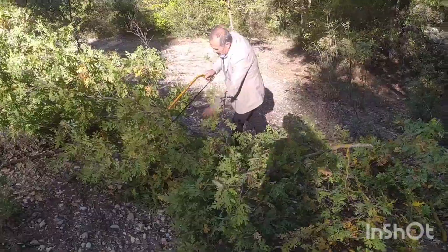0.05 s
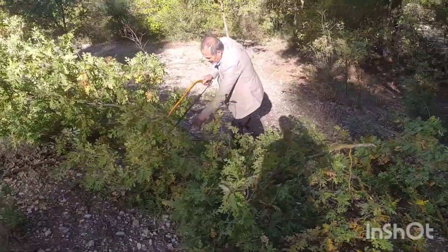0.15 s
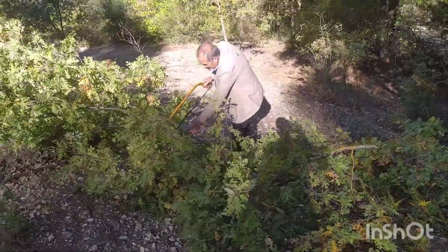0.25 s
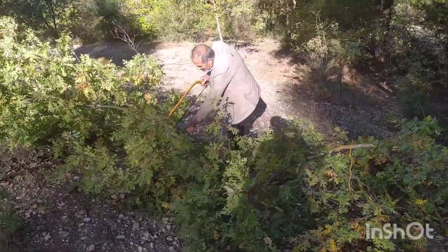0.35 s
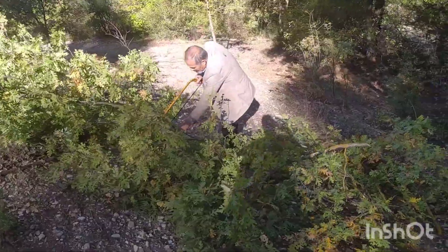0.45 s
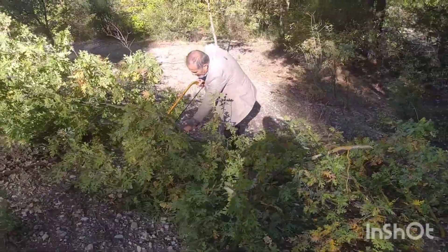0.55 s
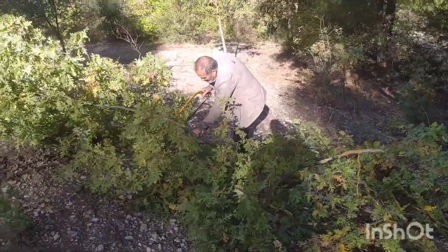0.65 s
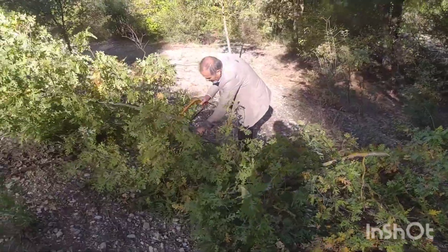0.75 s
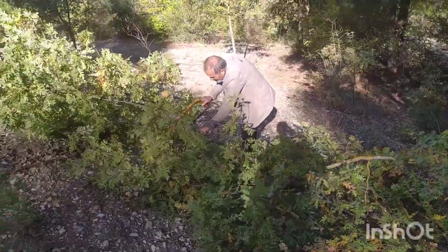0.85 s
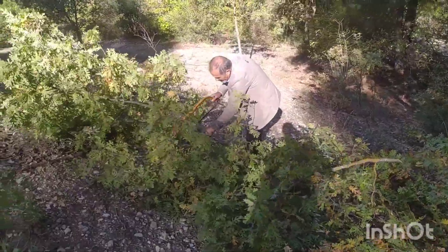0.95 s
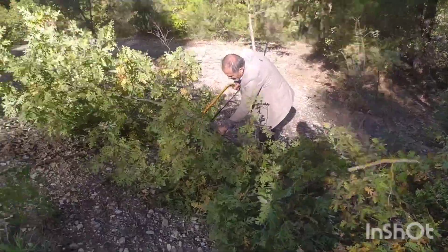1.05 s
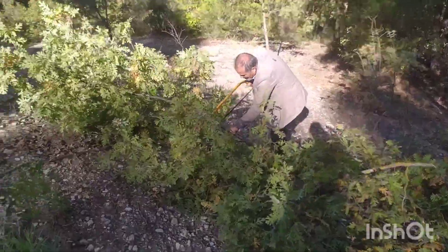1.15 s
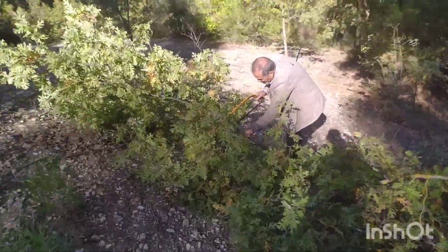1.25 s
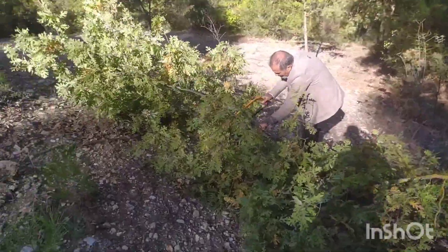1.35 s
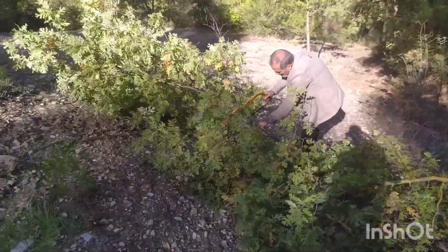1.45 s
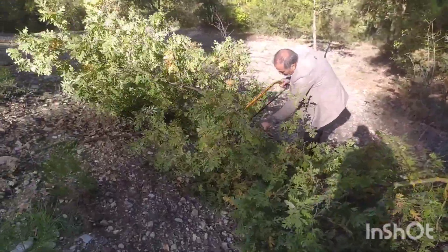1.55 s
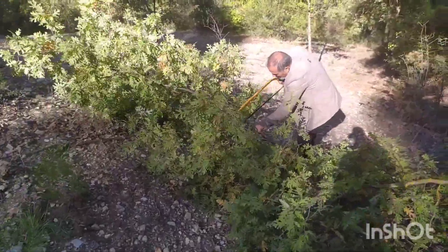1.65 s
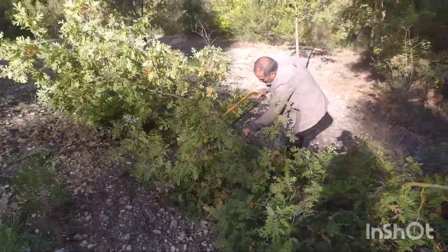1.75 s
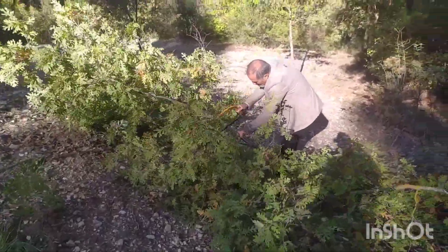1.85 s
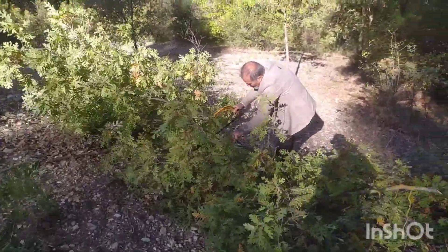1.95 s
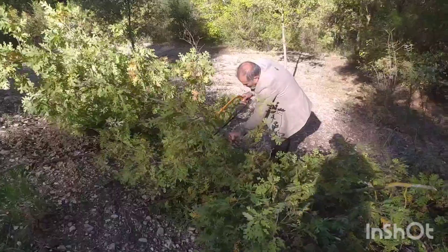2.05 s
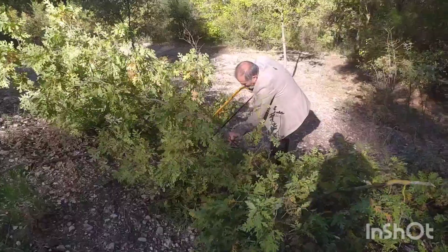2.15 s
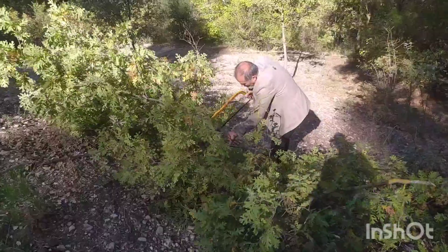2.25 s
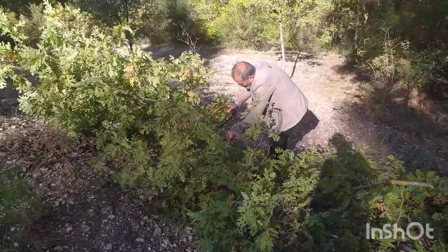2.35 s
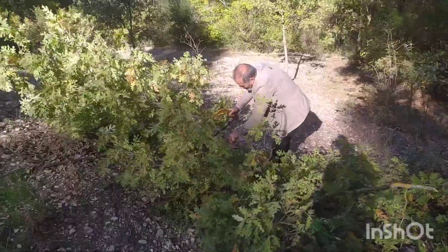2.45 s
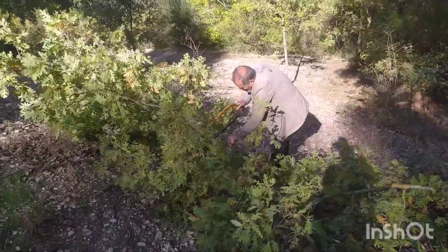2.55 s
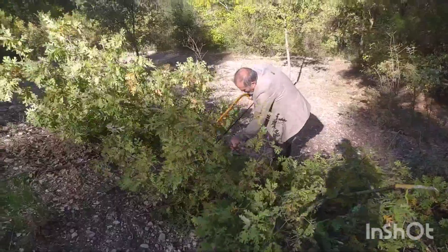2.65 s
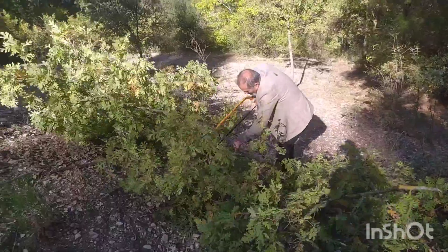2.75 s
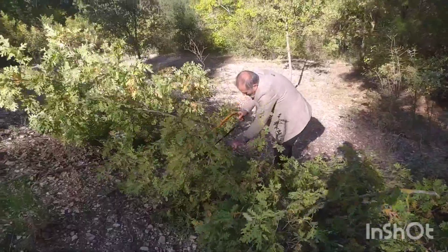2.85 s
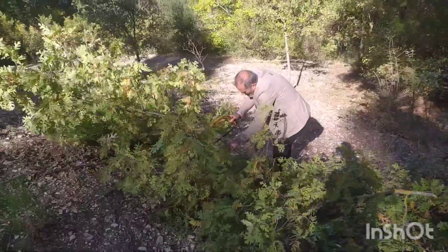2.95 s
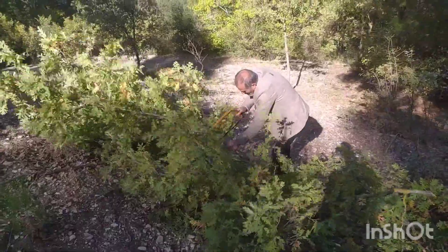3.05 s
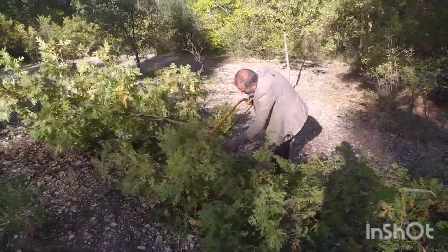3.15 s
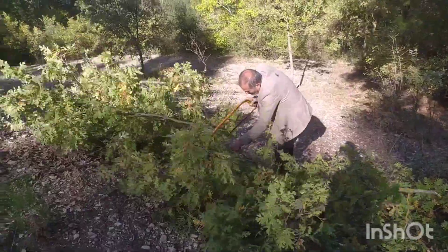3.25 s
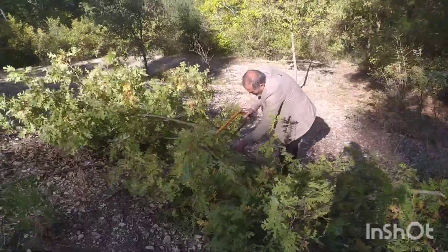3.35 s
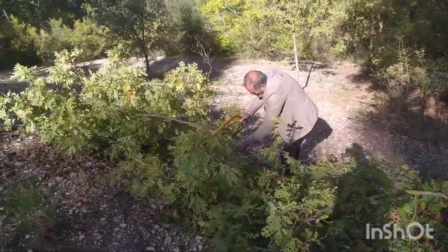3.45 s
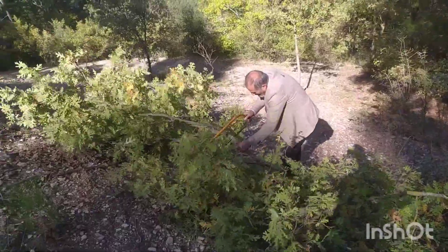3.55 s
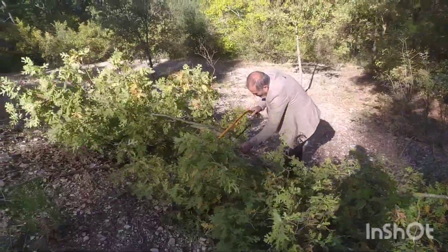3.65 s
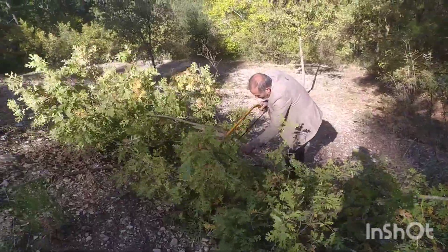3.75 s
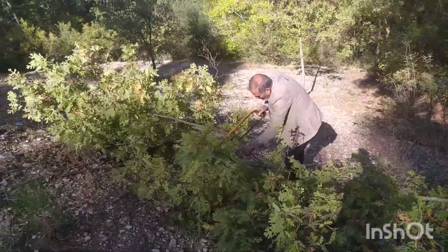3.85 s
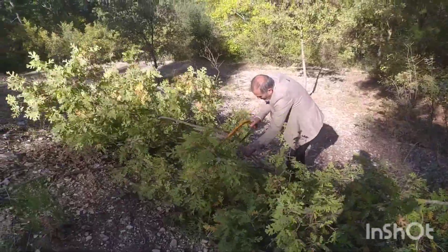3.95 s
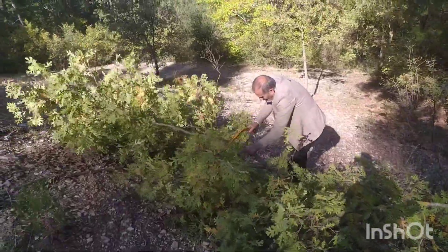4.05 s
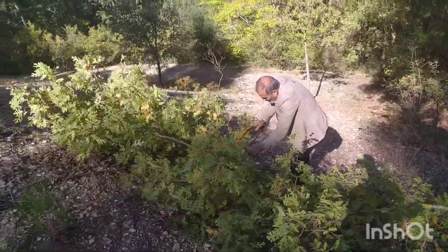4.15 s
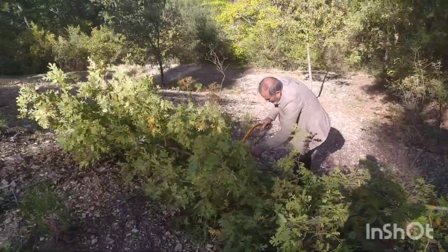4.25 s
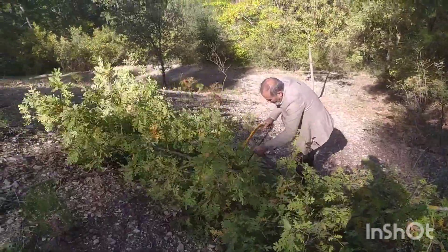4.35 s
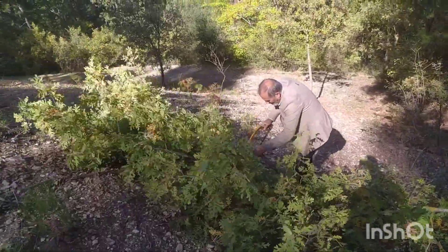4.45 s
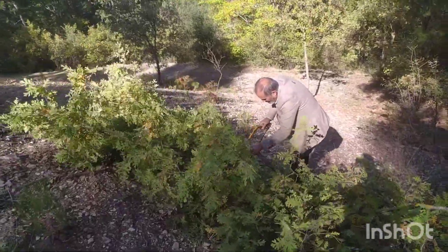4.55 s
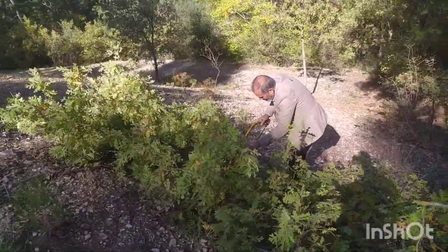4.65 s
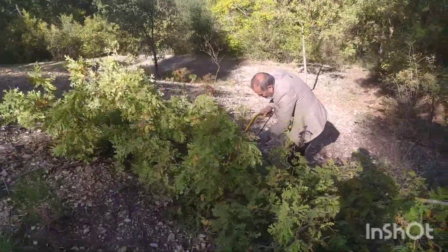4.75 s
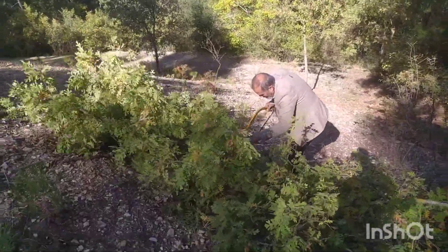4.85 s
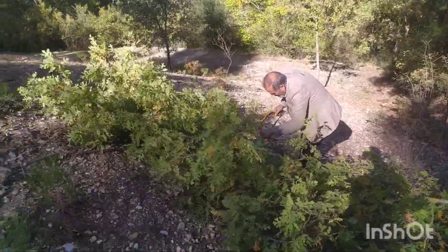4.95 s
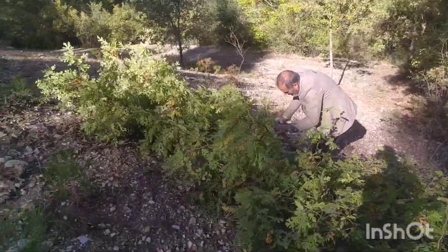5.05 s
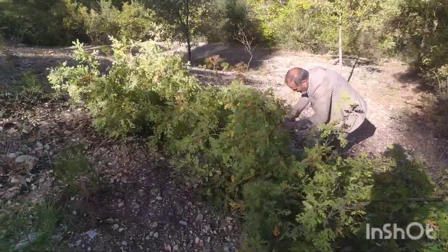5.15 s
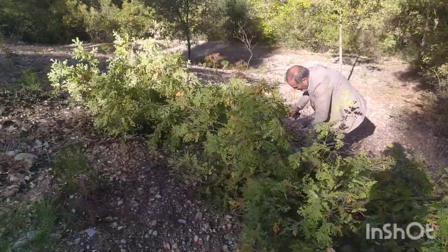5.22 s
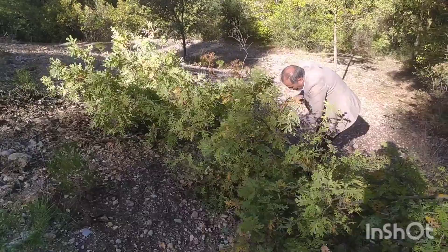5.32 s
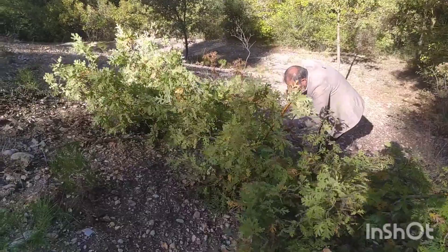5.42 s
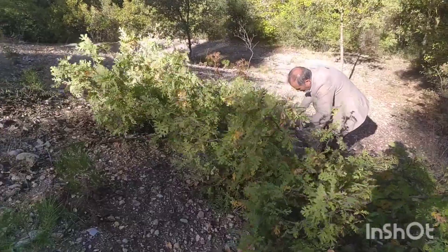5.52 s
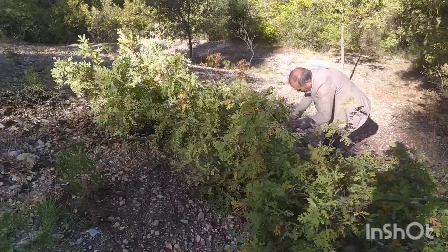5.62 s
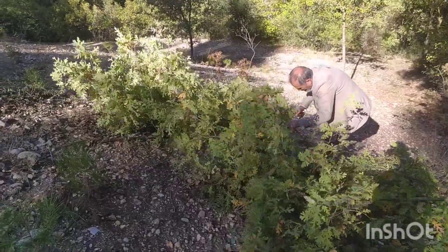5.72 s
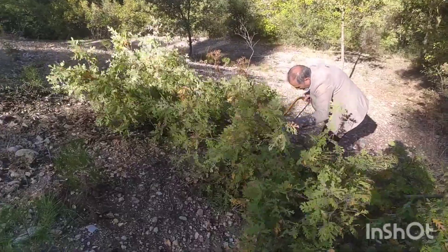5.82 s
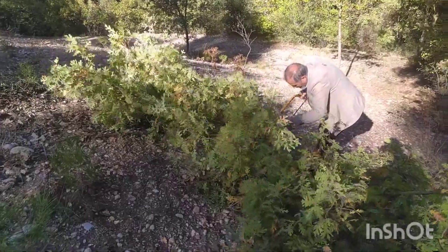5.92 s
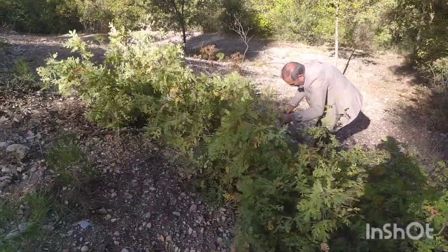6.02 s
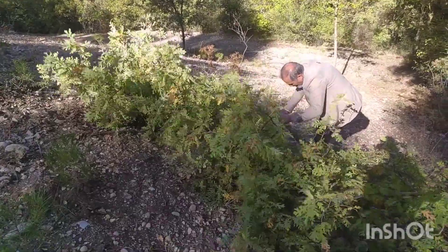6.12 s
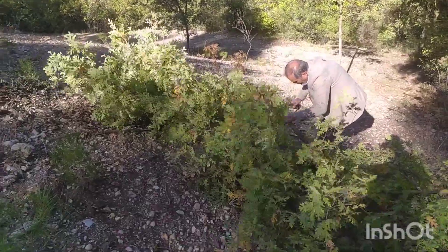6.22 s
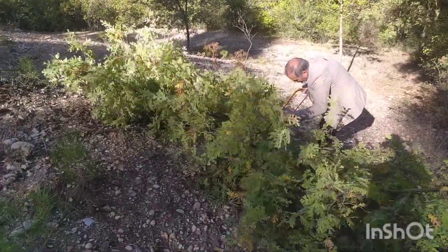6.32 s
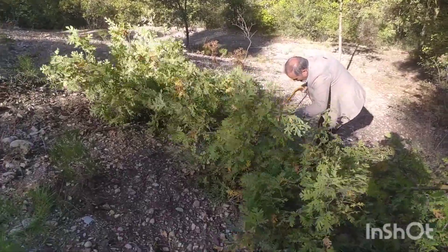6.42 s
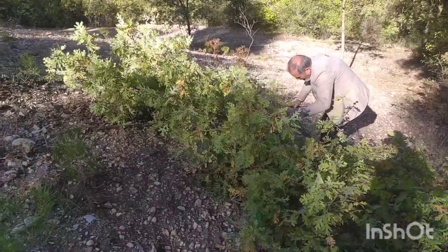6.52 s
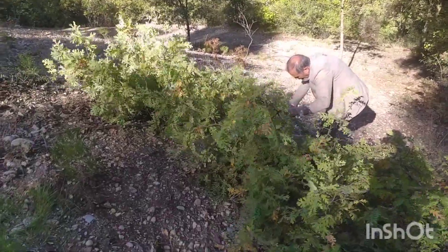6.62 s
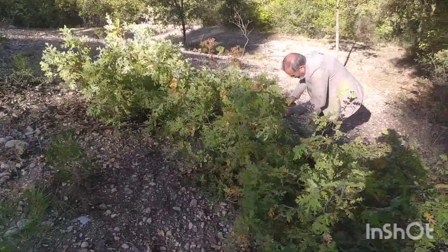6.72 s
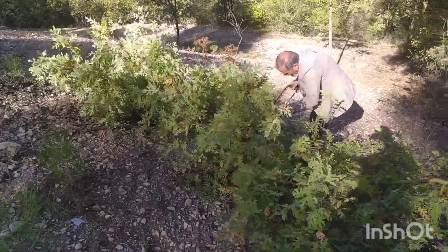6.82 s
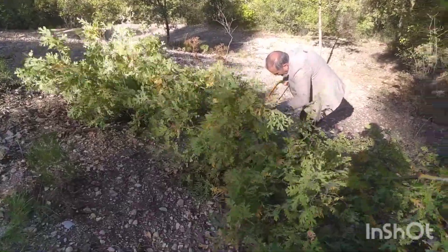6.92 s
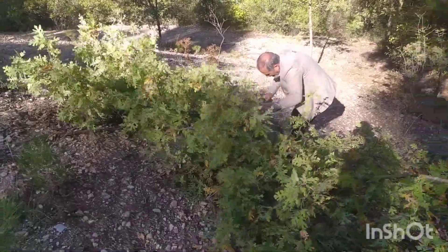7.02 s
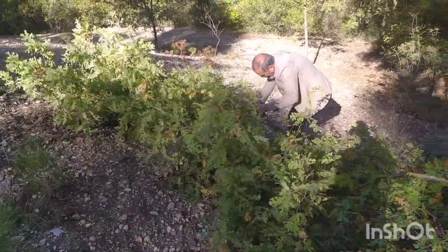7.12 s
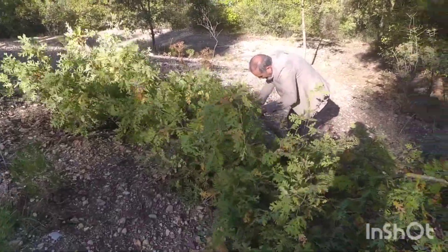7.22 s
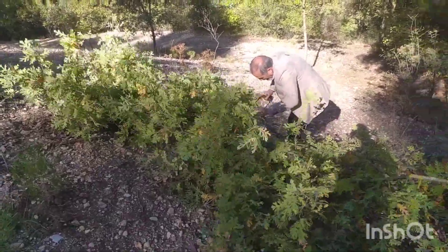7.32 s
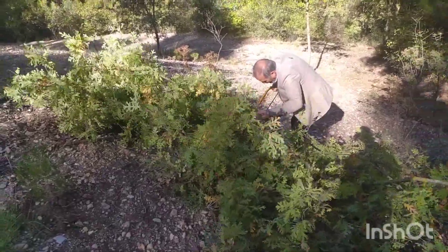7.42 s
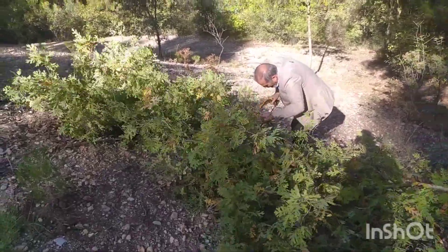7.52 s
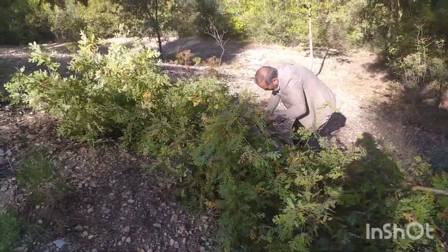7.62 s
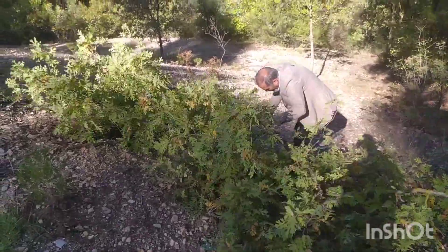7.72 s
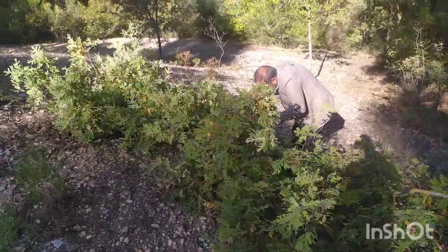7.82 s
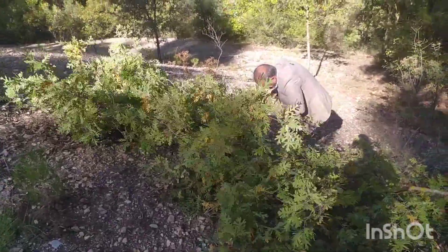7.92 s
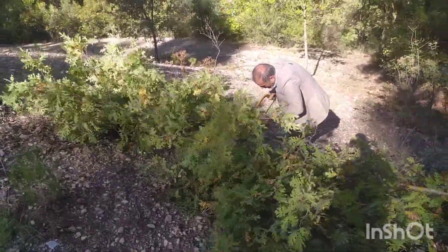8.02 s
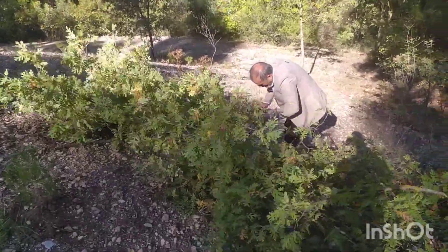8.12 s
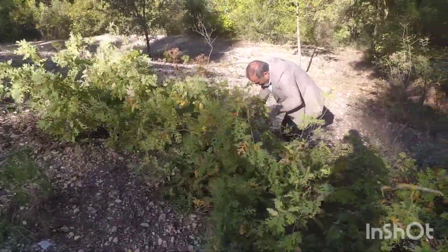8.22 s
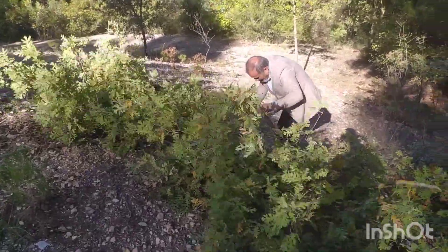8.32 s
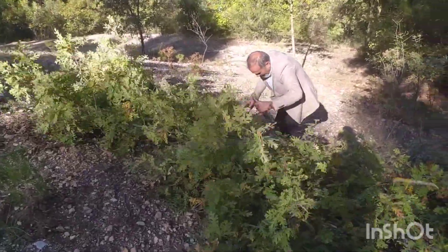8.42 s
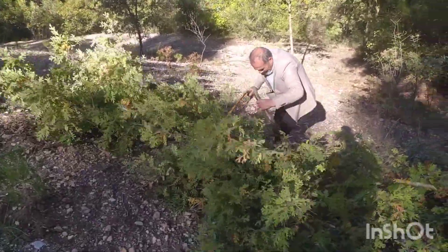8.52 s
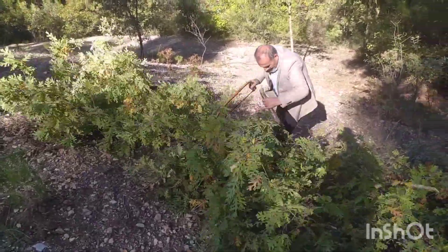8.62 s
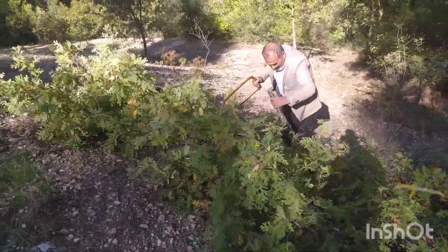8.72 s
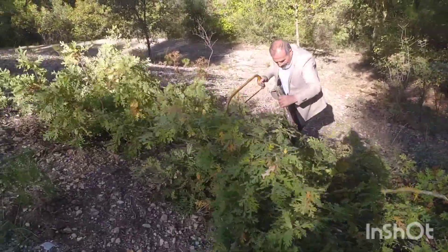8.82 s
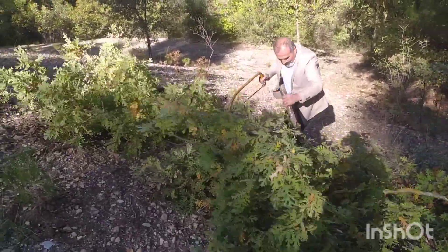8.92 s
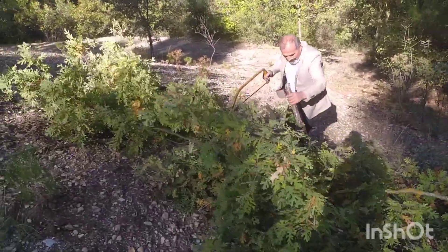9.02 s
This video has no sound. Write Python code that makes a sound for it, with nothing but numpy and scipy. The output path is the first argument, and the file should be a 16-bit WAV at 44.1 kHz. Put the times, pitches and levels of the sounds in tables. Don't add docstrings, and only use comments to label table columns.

```python
import sys
import numpy as np
from scipy import signal
from scipy.fft import rfft, irfft, next_fast_len
from scipy.io import wavfile
from scipy.ndimage import uniform_filter1d, map_coordinates

SR = 44100
rng = np.random.default_rng(int(sys.argv[2]) if len(sys.argv) > 2 else 0)


def pcm_store(signal):
    levels = np.round(np.clip(np.atleast_2d(signal), -1, 1) * 32767)
    wavfile.write(sys.argv[1], SR, levels.astype(np.int16).T)


def amplitude_ratio(level_db):
    exponent = np.asarray(level_db, float) / 20
    return 10 ** exponent


N = 400365

# start in seconds, length in seconds, bite in dB,
# pressure gained over the stroke in dB, steel hiss over the bite in dB.
PUSHES = [(1.17, 0.275, -35, 6.5, 6.5), (1.713, 0.2685, -32, 3.5, 7.5), (2.223, 0.2576, -32, 11.5, 6),
          (2.754, 0.2717, -33, -1, 6.5), (3.282, 0.2783, -37, -16.5, 7.5),
          (3.838, 0.304, -40.5, -29.5, 7.5), (4.905, 0.3103, -40, 11.5, 5), (5.46, 0.2624, -34.5, -3.5, 5),
          (5.954, 0.2612, -32, -4, 3), (6.417, 0.2832, -35, 34, 4.5), (6.941, 0.288, -31.5, 22.5, 3),
          (7.453, 0.2835, -37.5, 24.5, 6), (8.084, 0.192, -31.5, -13.5, 8.5)]
PULLS = [(0.926, 0.2867, -41.5, -21, 7.08), (1.461, 0.261, -39, -11, 4.7), (1.988, 0.263, -36.5, -18, 4.5),
         (2.508, 0.2588, -38.5, -23.5, 5.4), (2.996, 0.3013, -40, -11.5, 5.03),
         (3.579, 0.2634, -43.5, 2.5, 6.47), (4.664, 0.2785, -53, -11.5, 5.9),
         (5.182, 0.3075, -40.5, -8, 5.07), (5.682, 0.2774, -39, -2, 4.87), (6.172, 0.2832, -39.5, -1, 5.76),
         (6.69, 0.284, -39.5, 1, 6.1), (7.229, 0.263, -38.5, -0.5, 5.92), (7.69, 0.3365, -46.5, 9.5, 6.74),
         (8.349, 0.1582, -41.5, -26.5, 2.24)]
CATCHES = [
    (0.033, 0.057, -48.5, -6, 7.5),
    (0.452, 0.04, -55, 0, -8),
    (0.505, 0.058, -53.5, 0, -8),
    (0.6, 0.116, -48, 4.5, 3.5),
    (0.648, 0.27, -42, 0, 3.5),
]
# fastest moment in seconds, teeth a second in Hz,
# delay until the blade digs in in seconds, thrum in dB, extra bite in dB.
DIGS = [(1.33, 283, 0.041, -47, 3), (1.834, 328.3, 0.0388, -47.5, 2.5), (2.351, 319.5, 0.0203, -56, -1.5),
        (2.875, 331, 0.0359, -45, 4), (5.045, 301.7, 0.034, -63, -1.5), (6.096, 308.9, 0.034, -37.5, 8),
        (6.58, 321.9, 0.0346, -35, 3), (7.085, 323.3, 0.0536, -32.5, 3), (7.62, 311.7, 0.0364, -37, 4.5),
        (8.165, 290, 0.0036, -48, 2)]
# frequency in Hz, width in Hz, level in dB.
BLADE_MODES = [(1245.3, 165, -8.5), (1800, 344, -4.5), (2311.6, 141, 1), (2573, 94, -1),
               (2811, 104.3, -2.5), (3330.6, 167, -6.5), (3417, 159, -1.5), (3770, 117, -1),
               (4286, 273, -7), (5145, 320, -9)]
# frequency in Hz, width in Hz, level in dB.
DAMPED_MODES = [(1405, 701, -3), (2300, 1143, -0.5), (3740, 954, -2)]
# frequency in Hz, width in Hz, level in dB.
GRIPPED_MODES = [(3012, 476, 0), (3642, 415, -2)]
# frequency in Hz, width in Hz, level in dB.
WOOD_MODES = [(432.3, 92, -1.5), (693, 230, -7.5), (793.7, 90.6, 2), (966, 75, 0)]
# frequency in Hz, density in dB per Hz.
HISS_COLOUR = [(2530, -29), (4300, -15), (5850, -8.5), (6600, -5), (7210, -6.5), (9230, -1.5),
               (10400, -5.5), (11100, -10), (11800, -8), (14100, -17), (15100, -20), (16000, -57)]
# time in seconds, share from 0 to 1.
SINGING = [(.7, 0.81), (1.3, 0.68), (1.85, 0.8), (2.35, 0.82), (2.9, .7), (3.4, 0.77), (4.0, 0.64),
           (5.05, 0.72), (5.6, 0.83), (6.1, 0.62), (6.6, .7), (7.1, .6), (7.6, 0.71), (7.85, 0.25),
           (8.2, .6)]
# time in seconds, freedom from 0 to 1.
KERF_FREEDOM = [(.6, 0.92), (1.35, 0.85), (2.1, 0.12), (3.0, 0.53), (3.8, 0.31), (5.05, 0.55), (5.6, 0.06),
                (6.8, 0.23), (7.8, 0.65), (8.4, .2)]
# time in seconds, leaf hiss in dB.
LEAVES = [(0, -50), (.3, -60), (.9, -54.5), (1.19, -46.5), (1.5, -54.5), (3.0, -47.5), (3.84, -54),
          (4.1, -43.5), (4.3, -39.5), (4.42, -52), (4.68, -57), (5.2, -51.5), (5.95, -50), (6.6, -44),
          (7.0, -48.5), (7.7, -44.5), (8.06, -46), (8.3, -45), (9.08, -51.5)]
# frequency in Hz, width in Hz, depth from 0 to 1.
EARLY_NULLS = [(3180, 100.7, 1), (7310, 121.5, 0.43)]
# frequency in Hz, width in Hz, depth from 0 to 1.
LATE_NULLS = [(3226, 59, 0.66), (3988, 67.6, 0.58), (5840, 127, 0.8053)]
# time in seconds, peak in dB, knock over the peak in dB,
# knock pitch in Hz, left over right in dB.
TWIGS = [(.0014, -42, -16.5, 2340, -1.5), (.0396, -33.5, -15, 1460, -1), (.051, -33.5, -29.5, 2650, -0.5),
         (.0637, -32, -22, 2280, 8), (.1226, -41, -13.5, 1730, -6.5), (.1501, -50.5, -15, 1650, -4),
         (.172, -38.5, -16, 1840, -6), (.219, -39.5, -22.5, 1740, -7.5), (.2825, -35.5, -30.5, 1580, 2.5),
         (.3257, -34, -30, 1637, -0.5), (.4113, -34, -15, 3880, -4.5), (.0748, -37.5, -27, 2300, -1.5),
         (.1155, -44.5, -20, 1800, 0), (.2535, -42, -23.5, 2000, -0.5), (.274, -46.5, -24, 2000, -2),
         (.289, -41.5, -26.5, 2000, -4.5), (.352, -51.5, -20, 2000, -0.5), (.136, -53, 0.5, 903, 0),
         (.185, -45.5, -6, 1300, -0.5), (.46, -50.5, -2, 1010, 0), (.471, -49, -2.5, 1050, 0),
         (.5, -55, 3, 604, 0), (.53, -57, 4.5, 550, 0)]
FIBRES = [(.6586, -37, -12, 1800, -3), (1.1837, -31.5, -15, 2030, 3), (1.519, -29, -11.5, 4020, 0.5),
          (2.0308, -29, -9.5, 2280, -1.5), (2.2707, -32.5, -12, 2530, 0.5), (3.3174, -29, -29.5, 2878, 1),
          (3.8777, -29, -11, 3770, -3.5), (4.0885, -28, -32.5, 1940, -8.5), (4.207, -19, -18, 2920, 1),
          (4.236, -31, -29.5, 2340, -2.5), (4.2433, -30.5, -29.5, 2360, -5), (4.27, -28.5, -26, 1960, -7),
          (4.2848, -28.5, -19.5, 2180, 1), (4.3106, -13.5, -22.5, 1688, 0.5),
          (4.7172, -29.5, -25.5, 2925, 0), (5.033, -23.5, -27, 1640, -1.5),
          (5.7204, -22.5, -16.5, 1670, -2.5), (6.4504, -22, -36, 1724, -2.5),
          (7.2594, -22, -27.5, 1700, -2.5), (7.5268, -30.5, -14.5, 3790, -3.5),
          (8.1354, -25, -21.5, 2360, -0.5), (8.975, -31.5, -25.5, 2320, 0)]
BREAK = [
    (8.2382, -22, -27.5, 1500, -1.5),
    (8.2391, -14, -29, 1600, -1.5),
    (8.2404, -12.5, -16.5, 3320, -1.5),
    (8.2422, -16, -22, 3500, -1.5),
    (8.2441, -16, -24, 3316, -1.5),
    (8.2473, -23, -7, 3350, 0),
    (8.253, -26, -11.5, 2870, 0),
    (8.262, -27.5, -11, 3300, 0),
]
# time in seconds, firing rate in Hz, level of the third multiple in dB.
LOW_GEAR = [(0.0, 69.9, -55), (0.172, 71.22, -57), (1.246, 79.52, -50.5), (1.442, 80.35, -51.5),
            (1.498, 81.4, -65.5), (1.55, 79, -90)]
# time in seconds, firing rate in Hz, exhaust in dB.
HIGH_GEAR = [(3.0, 52.76, -79.5), (4.3, 48.94, -88), (5.5, 49.9, -70.5), (6.5, 50.04, -66.5),
             (7.5, 51.16, -65), (8.35, 51.68, -62), (8.6, 52.36, -61), (9.08, 54.62, -58)]
# multiple of the firing rate, level in dB.
LOW_ORDERS = [(2, -17.5), (3, -3), (4, -11), (5, -17), (6, -20)]
# multiple of the firing rate, level in dB.
PIPE_ORDERS = [(1, -8), (1.5, -15), (2, -9.5), (3, 2), (5, 0.5), (7, -2.5)]
# multiple of the firing rate, level in dB,
# growth in dB per dB of exhaust, gain under load in dB.
EVEN_ORDERS = [(4, -69.5, 0.19, 9.1), (6, -71, 0.704, 9.1), (8, -91.5, .5, 5)]
# time in seconds, level in dB.
ROAD_SWELL = [(0, -60.5), (1.5, -62), (3, -64.5), (4.6, -67.5), (5.5, -60.5), (7, -58), (8.2, -57.5),
              (9.08, -58.5)]
# frequency in Hz, density in dB per Hz.
ROAR_COLOUR = [(50, -21), (115, -11.5), (200, -0.5), (258, -1.5), (452, -5.5), (606, -12), (700, -12),
               (910, -27.5), (1540, -120)]
# frequency in Hz, density in dB per Hz.
RUMBLE_COLOUR = [(12, -31.5), (24, -4.5), (33, 0), (59, -13.5), (92, -12.5), (115, -15.5), (150, -55.5),
                 (250, -120)]
# frequency in Hz, density in dB per Hz.
AIR_COLOUR = [(290, -41), (500, -15), (718, -10.5), (855, 6), (933, 1.5), (1110, 4.5), (1320, 3),
              (4530, -12.5), (7420, 1), (16000, -8.5)]
# frequency in Hz, likeness from 0 to 1.
ALIKE = [(40, 0.193), (150, 0.752), (500, 0.855), (1500, 0.683), (3000, 0.655), (6000, 0.25), (15000, 0.31)]
# frequency in Hz, left over right in dB.
TILT = [(60, -1.5), (200, -3.5), (640, -4), (1410, 4), (3100, -1), (6000, -1), (9300, -3.5), (13500, 4.5)]
# frequency in Hz, lead of the left in radians.
LEAD = [(300, 0.25), (1030, 0.803), (1500, -0.485), (4000, -0.585), (5300, 1.91), (7000, 1.105),
        (15000, 1.71)]


def saw():
    teeth_hz, thrum_db, locked, dig_db = teeth()
    strokes = arm(PUSHES, rise_s=0.1511, fall_s=0.1194, body_db=-15.5, brighten_db=-0.5)
    strokes += arm(PULLS, rise_s=0.1379, fall_s=0.0794, body_db=-17.5, brighten_db=-1.5)
    strokes += arm(CATCHES, rise_s=0.0223, fall_s=0.1148, body_db=-14.5, brighten_db=-4.5)
    swaying = amplitude_ratio(curves(LEAVES)[0] + [[-11.5], [-20.5], [0]])
    ring_gain, body_gain, hiss_gain = np.hypot(strokes * amplitude_ratio(dig_db), swaying)

    turn = 2 * np.pi * np.cumsum(teeth_hz * (1 + 0.0298 * wobble(60))) / SR
    buzz = np.sin(turn) + 0.143 * np.sin(2 * turn) + 0.295 * np.sin(3 * turn)
    thrum = locked * amplitude_ratio(thrum_db + 2.74 * wobble(45)) * buzz
    gate = 1 + (0.053 + 0.13 * locked) * np.cos(turn)
    freedom = curves(KERF_FREEDOM)[0] - .5

    ring = blade_ring(gate, freedom)
    body = wood_body(gate) * amplitude_ratio(5 * freedom)
    hiss = steel_hiss(gate)
    return ring_gain * ring + body_gain * body + hiss_gain * hiss + thrum * [[1.3], [.3]]


def blade_ring(gate, freedom):
    singing = patchy(filtered(grit(gate, 1.5, chips=190, chip_db=-10), resonant(BLADE_MODES)), depth_db=2.0)
    plain = patchy(filtered(grit(gate, 1.5, chips=200, chip_db=-11), resonant(DAMPED_MODES)), depth_db=2.5)
    gripped = unit(filtered(grit(gate, 1.5, chips=110, chip_db=-6), resonant(GRIPPED_MODES)))
    share = np.clip(curves(SINGING)[0], 0, 1)
    return np.sqrt(share) * singing + np.sqrt(1 - share) * plain + amplitude_ratio(-10.5 - 8 * freedom) * gripped


def wood_body(gate):
    return unit(filtered(grit(gate, 2.5, chips=90, chip_db=-3), lambda f: resonant(WOOD_MODES)(f) * f / (f + 300)))


def steel_hiss(gate):
    hiss = patchy(filtered(grit(gate, 1.3, chips=420, chip_db=-9), colour(HISS_COLOUR)), depth_db=1.7)
    shine = filtered(hiss, lambda f: 1 / (1 + (10800 / (f + 1)) ** 8))
    return hiss + (amplitude_ratio(1.08 - ramp(1.27, 5.86)) - 1) * shine


def grit(gate, flutter_db, chips, chip_db):
    torn = (rng.random(N) < chips / SR) * amplitude_ratio(1.12 * rng.standard_normal(N))
    torn = signal.lfilter([1], [1, -.97], torn)
    pressure = amplitude_ratio(flutter_db * (wobble(35) + wobble(130)))
    return rng.standard_normal((2, N)) * gate * pressure * (1 + amplitude_ratio(chip_db) * torn)


def arm(strokes, rise_s, fall_s, body_db, brighten_db):
    gains = np.zeros((3, N))
    for s, length, db, lean_db, hiss_db in strokes:
        t = np.arange(round(length * SR)) / SR
        speed = np.sin(np.pi / 2 * np.minimum(t / rise_s, 1) * np.minimum((length - t) / fall_s, 1)) ** 2
        late = t / length - .5
        bite = speed * amplitude_ratio(db + lean_db * late)
        layers = amplitude_ratio([0 * t, body_db + 0 * t, hiss_db + brighten_db * late])
        gains[:, round(s * SR):][:, :len(t)] += bite * layers
    return gains


def teeth():
    t = np.arange(N) / SR
    fastest_s = np.transpose(DIGS)[0]
    halfway_s = np.convolve(fastest_s, [.5, .5], "valid")
    s, top_hz, lag_s, db, dig_db = np.transpose(DIGS)[:, np.searchsorted(halfway_s, t)]
    since = t - s
    hz = np.maximum(top_hz * np.exp(-(since / np.where(since < 0, .1, .125)) ** 2), 171.1)
    late = since - lag_s
    thrum_db = db + np.where(late < 0, np.maximum(597.5 * late, -16), -449.5 * late)
    locked = np.exp(-(since / np.where(since < 0, 0.05, 0.1045)) ** 4)
    dig = np.exp(-(late / 0.0217) ** 2) * (dig_db + [[0], [0.5], [0]])
    return hz, thrum_db, locked, dig


def patchy(x, depth_db):
    x = mottled(x, depth_db, window=512, bins=4, frames=16)
    return unit(mottled(x, 2.9, window=1024, bins=2, frames=6)[:, :N])


def mottled(x, depth_db, window, bins, frames):
    z = signal.stft(x, nperseg=window)[2]
    field = uniform_filter1d(rng.standard_normal(z.shape[1:]), size=bins, axis=0)
    field = uniform_filter1d(field, size=frames, axis=1)
    return signal.istft(z * amplitude_ratio(depth_db * unit(field)), nperseg=window)[1]


def ground(x):
    def band(nulls):
        return filtered(x, lambda f: sum(np.clip(depth, 0, 1) * np.exp(-((f - hz) / w) ** 2)
                                         for hz, w, depth in nulls))
    shifted = ramp(4.16, 4.93)
    return x - (1 - shifted) * band(EARLY_NULLS) - shifted * band(LATE_NULLS)


def snaps():
    crack, knock = np.zeros((2, N + SR)), np.zeros((2, N + SR))
    t = np.arange(SR // 8) / SR
    for rows, t60_s, shiver_db in ((TWIGS, 0.0124, -25.5), (FIBRES, 0.0208, -17.5), (BREAK, 0.019, -16.5)):
        for s, db, knock_db, knock_hz, pan_db in rows:
            splinters = amplitude_ratio(1.5 * np.repeat(rng.standard_normal(len(t) // 32 + 1), 32)[:len(t)])
            splinters = splinters * (1 - np.exp(-t / 0.000274))
            fall = amplitude_ratio(-60 * t / t60_s) + amplitude_ratio(shiver_db - 60 * t / 0.26)
            burst = fall * splinters * rng.standard_normal((2, 2, len(t)))
            burst[:, :, 6] += 2.5
            ping = 1.337 * amplitude_ratio(-60 * t / 0.0118) * np.sin(2 * np.pi * knock_hz * t)
            at = slice(round(s * SR), round(s * SR) + len(t))
            crack[:, at] += amplitude_ratio(db + np.array([[.5], [-.5]]) * pan_db) * burst[0]
            knock[:, at] += amplitude_ratio(db + knock_db) * (burst[1] + ping * [[1], [0]])
    bright = filtered(crack[:, :N], resonant([(6940, 3700, -1), (8936, 1400, 9.0), (12340, 4300, -9.5)]))
    woody = filtered(knock[:, :N], resonant([(1700, 1640, 2.88), (3000, 1110, 8.62), (4930, 2660, 1)]))
    return amplitude_ratio(2) * bright + amplitude_ratio(5.0) * spread(woody)


def engine():
    low_hz, low_db = curves(LOW_GEAR)
    high_hz, pipe_db = curves(HIGH_GEAR)
    high = drone(high_hz, PIPE_ORDERS, pipe_db)
    load = ramp(8.49, 8.61)
    for order, db, growth, load_db in EVEN_ORDERS:
        high = high + drone(high_hz, [(order, db)], growth * (pipe_db - pipe_db.mean()) + load_db * load)
    return drone(low_hz, LOW_ORDERS, low_db) + ramp(3.057, 3.06) * high


def drone(hz, orders, db):
    turn = 2 * np.pi * np.cumsum(hz) / SR
    total = np.zeros(N)
    for k, level in orders:
        gain = amplitude_ratio(db + level + 3 + 1.1 * wobble(2.5))
        total += gain * np.sin(k * turn + .2 * wobble(5) + k * k)
    return total


def air():
    road, deep, still = (unit(filtered(rng.standard_normal((2, N)), colour(shape)))
                         for shape in (ROAR_COLOUR, RUMBLE_COLOUR, AIR_COLOUR))
    road = amplitude_ratio(curves(ROAD_SWELL)[0]) * road
    deep = amplitude_ratio(-64.5 + 2.3 * wobble(0.71)) * deep
    return road + deep + amplitude_ratio(-61.0 + 0.662 * wobble(2.86)) * patchy(still, depth_db=2)


def spread(pair):
    def share(hz):
        angle = np.arccos(np.clip(along(ALIKE, hz), -1, 1)) / 2
        return np.array([np.cos(angle), np.sin(angle)])

    def port(hz):
        return amplitude_ratio(np.outer([.5, -.5], along(TILT, hz))) * np.exp(np.outer([.5j, -.5j], along(LEAD, hz)))
    mid, side = filtered(pair, share)
    return filtered(np.array([mid + side, mid - side]), port)


def resonant(modes):
    return lambda f: sum((-1) ** k * amplitude_ratio(db) * 1j * f * w / (c * c - f * f + 1j * f * w)
                         for k, (c, w, db) in enumerate(modes))


def colour(points):
    return lambda f: amplitude_ratio(along(points, f))


def filtered(x, response):
    m = next_fast_len(N + SR // 2)
    return irfft(rfft(x, m) * response(np.fft.rfftfreq(m, 1 / SR)), m)[..., :N]


def along(points, hz):
    f, v = np.transpose(points)
    return np.interp(np.log(hz + 1), np.log(f + 1), v)


def curves(rows):
    s, *cols = np.transpose(rows)
    return [np.interp(np.arange(N) / SR, s, c) for c in cols]


def ramp(start_s, full_s):
    return np.clip((np.arange(N) / SR - start_s) / (full_s - start_s), 0, 1)


def wobble(rate):
    return map_coordinates(rng.standard_normal(int(N * rate / SR) + 4), [np.arange(N) * rate / SR])


def unit(x):
    return x / np.sqrt(np.mean(x ** 2) + 1e-20)


def scene():
    near = amplitude_ratio(0.8425) * spread(ground(saw()) + air())
    return near + snaps() + engine() * amplitude_ratio([[-1.1], [1.1]])


def low_pass(x):
    return signal.sosfilt(signal.butter(12, 15830, fs=SR, output="sos"), x)


def record(dry):
    return low_pass(dry)


dry = scene()
out = record(dry)
pcm_store(out)
```